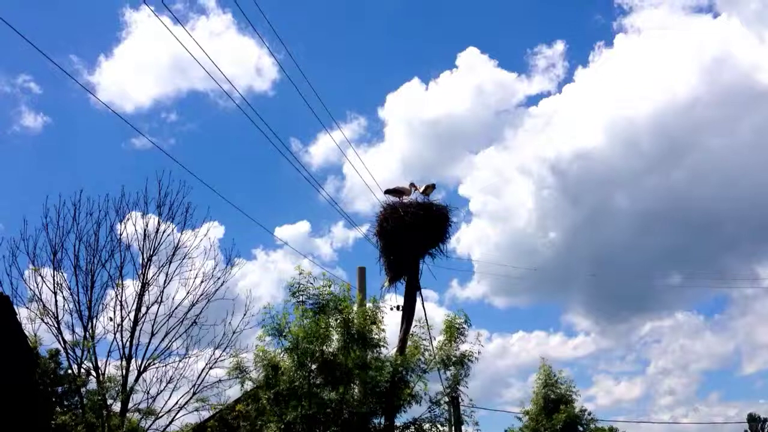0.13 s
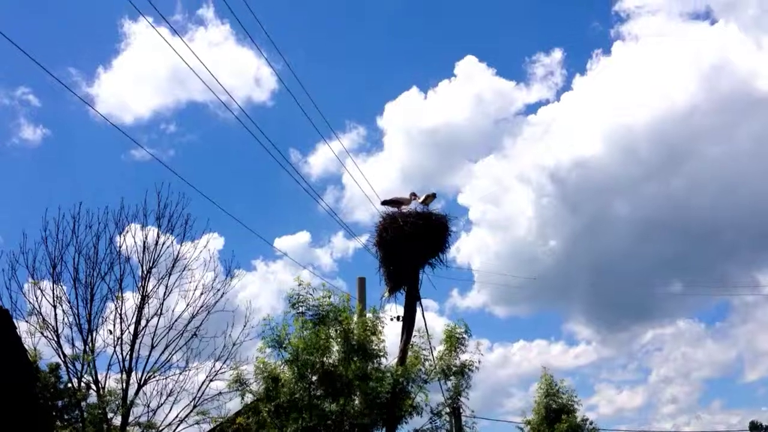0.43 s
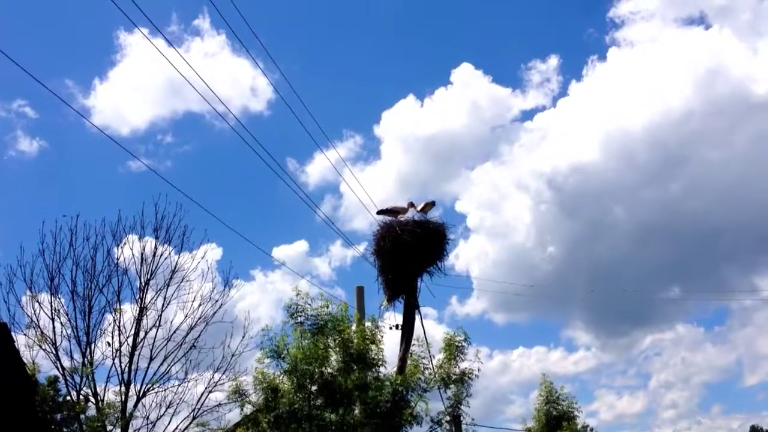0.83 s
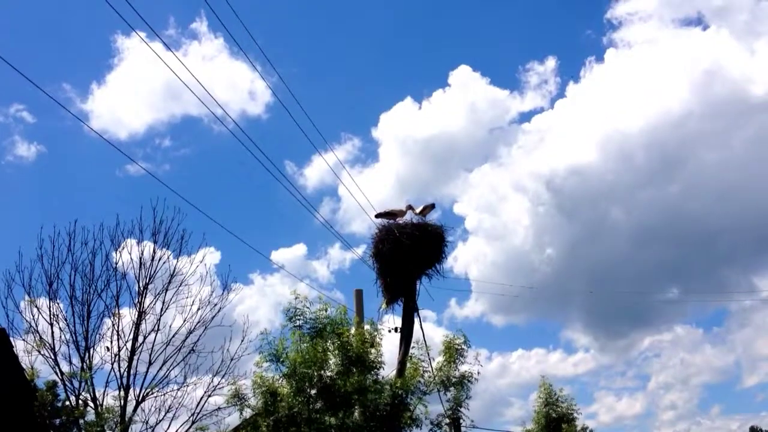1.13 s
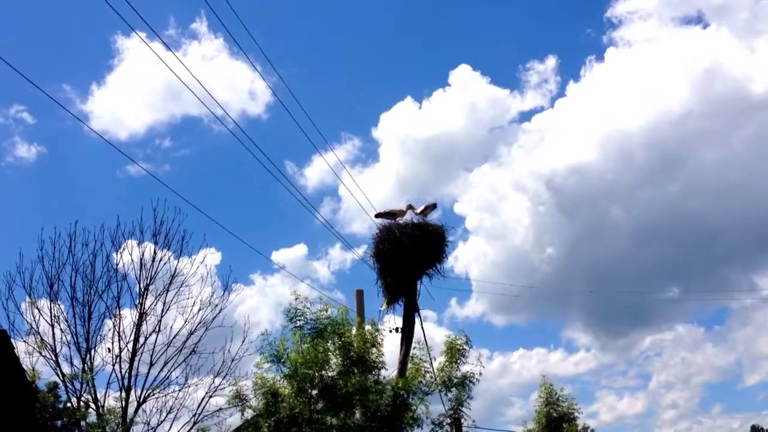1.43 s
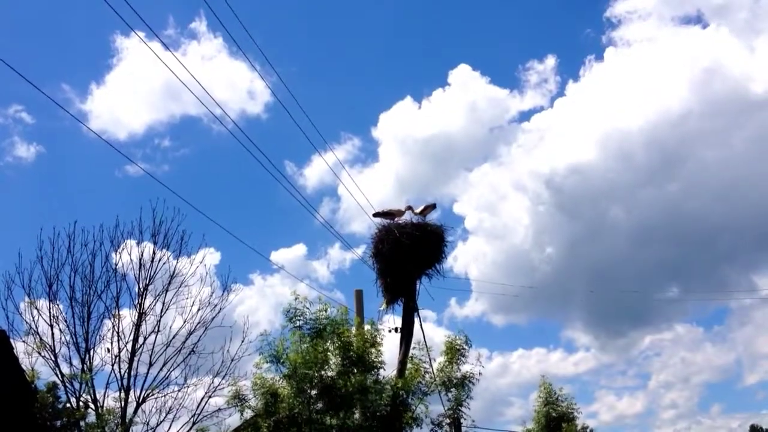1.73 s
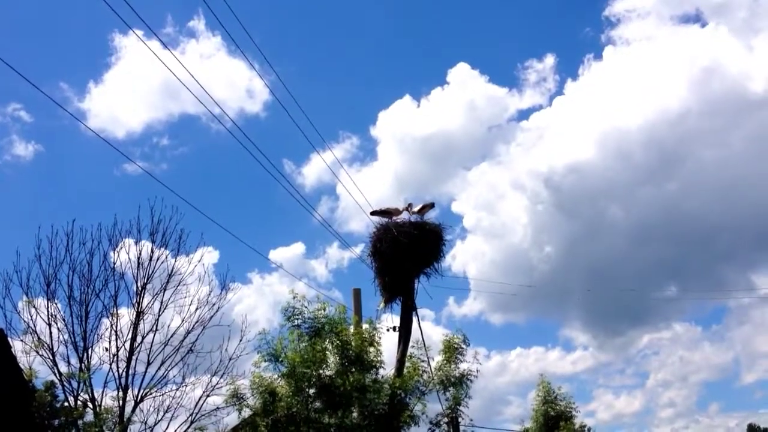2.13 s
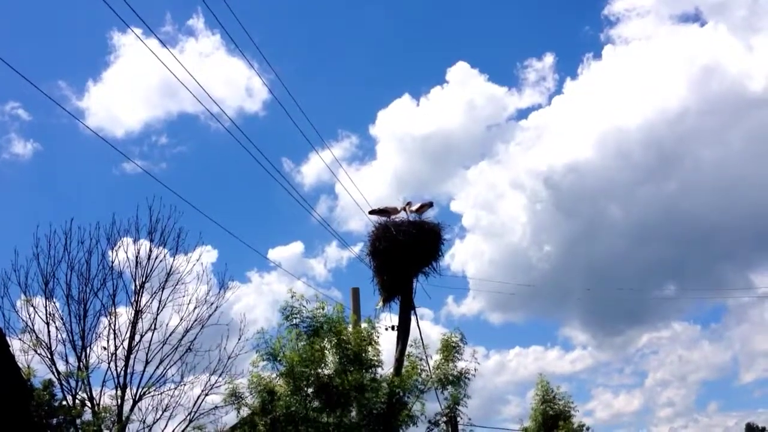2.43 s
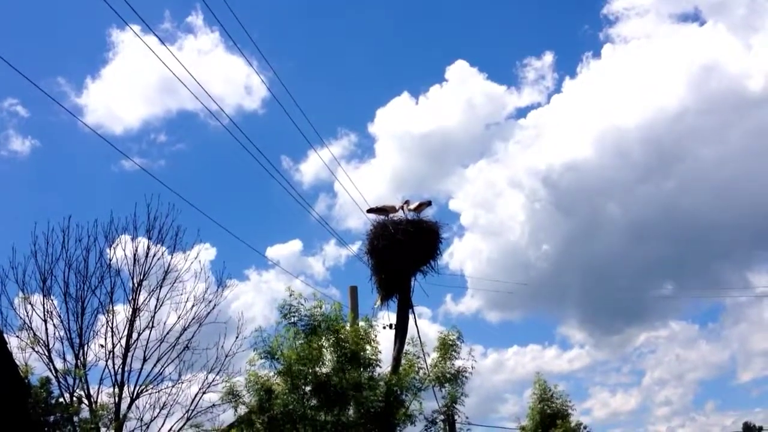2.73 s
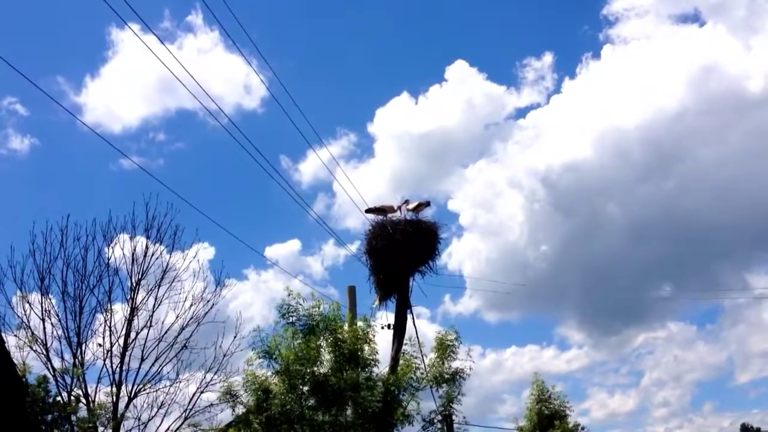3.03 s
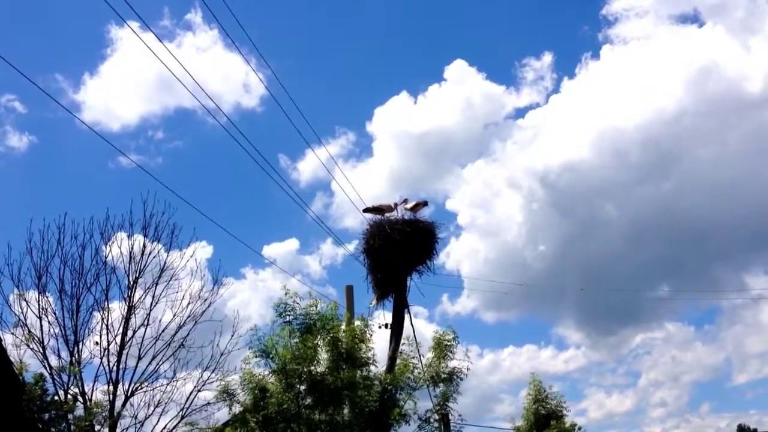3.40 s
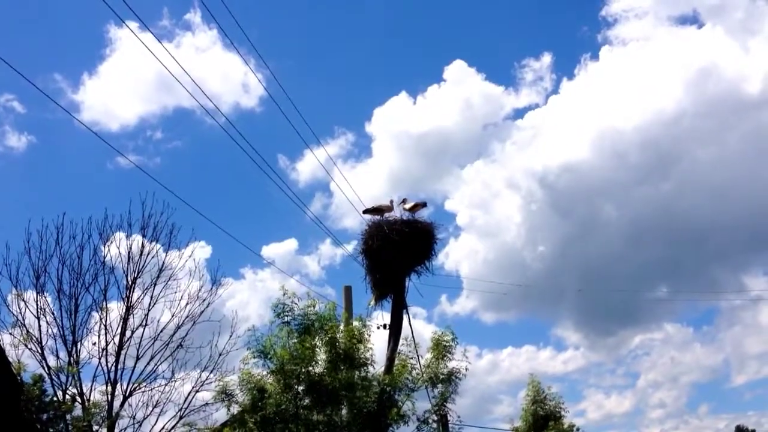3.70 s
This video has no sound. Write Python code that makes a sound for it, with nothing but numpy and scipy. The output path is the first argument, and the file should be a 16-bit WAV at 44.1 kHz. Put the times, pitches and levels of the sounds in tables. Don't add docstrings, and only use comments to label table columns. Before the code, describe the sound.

Rapid dry bill clatter from a nesting stork starts almost at once, echoing off ground and yard, then dies away before a brief piercing bird whistle; chirps continue over soft hum, leaves and small-microphone hiss.

```python
import sys
import numpy as np
from scipy import signal
from scipy.io import wavfile
from scipy.ndimage import uniform_filter1d

SR = 44100
rng = np.random.default_rng(int(sys.argv[2]) if len(sys.argv) > 2 else 0)


def volts(x):
    e = np.asarray(x, float) / 20
    return 10 ** e


def master_out(mix):
    frames = np.transpose(np.atleast_2d(mix))
    ceiling = np.clip(frames, -1, 1)
    pcm = np.round(ceiling * 32767).astype(np.int16)
    wavfile.write(sys.argv[1], SR, pcm)


N = 170226

# frequency in Hz, level in dB per Hz.
HUM_SPECTRUM = [(15, -60), (25, -48), (120, -8.5), (317, 0), (584, -5.5), (778, -8), (889, -6.5),
                (1120, -13.5), (2400, -23), (3120, -20), (5280, -120)]
LEAF_SPECTRUM = [(1500, 1), (2500, -7), (3200, 1), (4800, -1.5), (5100, -6), (7000, -8.5), (8500, -10),
                 (9500, -21)]
WIND_SPECTRUM = [(20, -22), (50, -29), (100, 0), (170, -1.5), (300, -25)]
HISS_SPECTRUM = [(6000, -13), (9000, -7), (11000, 0), (13500, 3.5), (15200, 5.5), (15450, -28),
                 (16300, -25)]

# start in seconds, length in seconds, from in Hz, to in Hz, level in dB.
WHISTLES = [(1.311, 0.04, 3900, 5050, -55), (1.349, .03, 3870, 4980, -56), (1.44, 0.055, 2210, 2430, -62),
            (1.496, .14, 2346, 2380, -61.5), (2.305, .028, 6150, 7000, -64),
            (2.35, 0.043, 2970, 3770, -56.5), (2.449, 0.035, 5700, 5590, -65),
            (2.465, 0.025, 5600, 5600, -50), (2.477, 0.086, 5600, 5700, -75), (2.678, .03, 3900, 3380, -65),
            (2.688, .02, 4660, 4730, -62), (2.802, .075, 2940, 2600, -64), (2.871, 0.082, 2583, 2490, -66),
            (2.907, .016, 3370, 4700, -63), (2.921, 0.0144, 2760, 3890, -62),
            (2.926, 0.026, 3750, 5060, -53.5), (2.935, 0.035, 3450, 4860, -59),
            (2.986, 0.028, 2450, 2410, -67), (3.028, .02, 2400, 2400, -70), (3.285, 0.019, 3290, 2470, -64),
            (3.338, .0146, 3580, 4110, -57.5), (3.34, .05, 3970, 2680, -62),
            (3.566, 0.033, 2220, 3080, -62), (3.565, 0.048, 2750, 4200, -58.5),
            (3.594, .02, 3330, 3900, -54), (3.603, 0.034, 4260, 3030, -56.5),
            (3.638, 0.11, 3540, 3350, -63.5), (3.772, 0.096, 3060, 3170, -64),
            (3.78, 0.01, 4700, 4660, -61), (3.829, 0.016, 4030, 4700, -60), (3.839, 0.017, 4750, 4760, -56)]
# start in seconds, length in seconds, from in Hz,
# to in Hz, level in dB.
CHIRPS = [(0.128, .028, 4780, 4640, -62.5), (0.17, .033, 6850, 6050, -60.5),
          (0.731, 0.018, 4220, 4020, -62), (1.1, 0.025, 4710, 4660, -65), (1.521, 0.031, 3850, 4650, -66),
          (1.628, 0.049, 4650, 5100, -60.5), (1.798, 0.037, 4030, 4780, -56.5),
          (2.073, 0.0326, 4510, 4840, -58), (2.098, 0.036, 4650, 4470, -61),
          (2.299, .022, 4660, 4710, -60.5), (2.41, 0.026, 4530, 3370, -61.5),
          (2.964, 0.028, 3850, 4900, -65), (3.076, .014, 6200, 6050, -68), (3.098, 0.024, 4720, 4840, -51),
          (3.129, 0.019, 4060, 3450, -60), (3.392, 0.0095, 4780, 4150, -66), (3.433, .021, 4780, 4200, -63),
          (3.551, 0.02, 4230, 5030, -66.5)]
# start in seconds, length in seconds, from in Hz, to in Hz,
# level in dB.
STROKES = [(1.029, .014, 3690, 4820, -57.5), (1.042, 0.024, 3990, 3490, -56),
           (1.068, .013, 4800, 4630, -64), (1.07, 0.018, 3910, 2980, -58), (1.97, 0.0081, 3930, 4750, -52),
           (1.977, 0.014, 4740, 4630, -53), (1.992, 0.0079, 3840, 4800, -50),
           (1.993, 0.015, 3230, 3570, -50.5), (2.001, 0.013, 4770, 4400, -56),
           (2.013, 0.015, 4290, 3120, -54), (2.033, .024, 3740, 2950, -60), (2.041, .015, 4800, 4440, -62),
           (2.064, 0.0147, 5350, 7600, -64), (2.19, 0.015, 3500, 3730, -68),
           (2.208, .02, 2960, 3170, -65.5), (2.316, 0.0194, 4280, 3270, -58),
           (2.336, 0.0187, 4130, 4760, -54), (3.092, .011, 3800, 4870, -57), (3.118, .009, 4750, 3500, -58),
           (3.119, 0.014, 3440, 3350, -59), (3.145, 0.024, 3026, 3240, -58.5),
           (3.166, 0.014, 3200, 4600, -56), (3.18, 0.0053, 3360, 3000, -59)]

# start in seconds, peak in dB, hollowness in dB, slap in dB,
# bite of the tips in dB.
NEAR_CLACKS = [(.2379, -21.5, -9, -1.5, 6.5), (.3444, -17.5, -6, -7, 3.5), (.4524, -17, -6.5, -6.5, 0.5),
               (.5616, -20.5, -3, -4, 4), (.6629, -19, -2.5, -4.5, -3), (.7639, -20.5, -10, -5.5, -0.5),
               (.8669, -24.5, -3, -3, -11), (.9616, -24, -4.5, -4.5, -1), (1.0595, -26, 2, -2.5, -2),
               (1.1617, -23.5, -2, 3, 1.5), (1.2745, -19, -7.5, -2, 1.5), (1.3873, -20, -2, -2, 0.5),
               (1.4992, -20, -1.5, -1.5, 1.5), (1.6088, -21.5, -5.5, -1.5, 4), (1.7185, -23, -5, 0, 2.5),
               (1.8249, -21.5, -1.5, -3.5, 0.5), (1.928, -21, -16, -6, 0.5), (2.0335, -22.5, -6, -4, 3),
               (2.1336, -23.5, -7.5, -5.5, 3), (2.2355, -28.5, 1, -5, 1.5), (2.3364, -32, -0.5, -5.5, 4),
               (2.4378, -41, 10.5, -8, 4)]
# start in seconds, peak in dB, hollowness in dB, slap in dB.
MATE_CLACKS = [(0.2151, -29, 1.5, -22), (0.3752, -31.5, -5, -14), (0.532, -31.5, 2, -5.5),
               (.6924, -36, 6.5, -26), (0.848, -39, 6, 4.5), (1.0014, -42, 12, 3), (1.3318, -36.5, 7, -2),
               (3.8565, -41, -10, -10), (.1445, -42.5, 8, -8)]
# start in seconds, peak in dB,
# hollowness in dB, slap in dB.
EARLIER_CLACKS = [
    (.09, -21, 1.5, 0),
]
# frequency in Hz, level in dB, 60 dB decay time in seconds.
BILL_MODES = [(742, -16.5, 0.028), (628, -26, 0.062), (1710, -18, 0.022), (1784, -14, 0.017),
              (2634, -12, 0.017), (3480, -13, 0.012), (4600, -18, 0.0037), (5940, -36, 0.011),
              (7120, -16.5, 0.0056), (8050, -23, 0.01), (1515, -30.5, 0.022), (2460, -27, 0.0081),
              (2990, -19, 0.012)]
# frequency in Hz, level in dB per Hz.
TICK_SPECTRUM = [(700, 5), (1250, -8), (1900, 0.5), (4500, 1.5), (5400, -7.5), (7300, -3.5), (9400, -14.5),
                 (16000, -33)]
# time in seconds, pitch as a factor.
POSTURE = [(.2, 1.023), (1.06, 1.066), (1.16, 1.022), (2.4, 0.99)]
# frequency in Hz, 60 dB decay time in seconds.
YARD_DECAY = [(400, 0.98), (1000, 0.75), (2800, 0.59), (7000, 0.64), (12000, 0.72)]

CHORUS_PER_S, CHORUS_LOW_HZ, CHORUS_TOP_HZ, CHORUS_DB = 55, 2800, 4650, -69
WARBLE_HZ, STROKE_WARBLE_HZ, WHISTLE_WARBLE_HZ, WARBLE_PER_S = 131, 60, 22, 117.3
LEVELS_OFF = 1.18
FLUTTER_DB, FLUTTER_S = 3, 0.0046
BIRD_WET_DB, BIRD_T60_S = -0.5, 0.2

TAPS = 1500
SLAP_S, SLAP_RISE_S, SLAP_SMEAR_RAD = 0.0013, 0.00055, 1.3
SCATTER, COLOUR_DB = 0.03, 5
TIP_HZ, TIP_DB, TIP_T60_S = 4040, -17.5, 0.0033
RATTLE_DB, RATTLE_T60_S = -12.5, 0.013
GROUND_S, GROUND_SPREAD_S, GROUND_DB, GROUND_DULL_HZ = 0.0051, 0.0035, -9.5, 4170
RING_IN_YARD_DB, MATE_DULL_HZ = -3.5, 6500
YARD_DB, YARD_START_S = -7.5, 0.0023
NEAR_DB, NEAR_START_S, NEAR_T60_S = -9, 0.007, 0.029


def evened(x):
    return x / np.sqrt(np.mean(x ** 2) + 1e-20)


def read(points, hz):
    f, value = np.transpose(points)
    return np.interp(np.log(hz + 1), np.log(f + 1), value)


def add(mix, s, sound):
    part = mix[round(s * SR):][:len(sound)]
    part += sound[:len(part)]


def dull(x, hz):
    return signal.lfilter(*signal.butter(2, hz, fs=SR), x)


def tail(t60s, start_s):
    hz, t, z = signal.stft(rng.standard_normal(SR // 2), SR, nperseg=128)
    decay = volts(-60 * t / read(t60s, hz)[:, None])
    out = signal.istft(z * decay, SR, nperseg=128)[1]
    out = out * np.clip(np.arange(len(out)) / SR / start_s, 0, 1) ** 2
    return out / np.linalg.norm(out)


def wash(shape, patchy_db, swell_db):
    frames, hz = N // 256 + 5, np.fft.rfftfreq(1024, 1 / SR)
    a, b, patches = rng.standard_normal((frames, 513, 3)).T
    patches = uniform_filter1d(patches, size=14, axis=0)
    patches = evened(uniform_filter1d(patches, size=10, axis=1))
    swell = evened(uniform_filter1d(rng.standard_normal(frames), size=30))
    inside = (hz >= shape[0][0]) & (hz <= shape[-1][0])
    level_db = read(shape, hz)[:, None] + patchy_db * patches + swell_db * swell
    z = (a + 1j * b) * inside[:, None] * volts(level_db)
    return evened(signal.istft(z, nperseg=1024, noverlap=768)[1][:N])


def background_air():
    hum = volts(-57.5) * wash(HUM_SPECTRUM, patchy_db=1.5, swell_db=0.17)
    leaves = volts(-65.5) * wash(LEAF_SPECTRUM, patchy_db=2.0, swell_db=1.6)
    wind_db = -67.5 - 5 * np.arange(N) / SR
    wind = volts(wind_db) * wash(WIND_SPECTRUM, patchy_db=1, swell_db=1)
    return hum + leaves + wind


def note(length, from_hz, to_hz, db, warble_hz):
    t = np.arange(0, length, 1 / SR)
    wobble = np.sin(2 * np.pi * (WARBLE_PER_S * t + from_hz / 100))
    glide = t / length
    if to_hz > from_hz:
        glide = np.sin(LEVELS_OFF * glide) / np.sin(LEVELS_OFF)
    hz = from_hz + (to_hz - from_hz) * glide + warble_hz * wobble
    soft_ends = np.sin(np.pi * t / length) ** 0.44
    level = volts(db + min(warble_hz / 60, 3) * wobble) * soft_ends
    return np.sqrt(2) * level * np.sin(2 * np.pi * np.cumsum(hz) / SR)


def far_chorus():
    far = np.zeros(N)
    span = CHORUS_TOP_HZ - CHORUS_LOW_HZ
    for s, a, b, c, d in rng.random((int(CHORUS_PER_S * N / SR), 5)):
        from_hz = CHORUS_TOP_HZ - span * b ** 1.4
        to_hz = CHORUS_TOP_HZ - span * c ** 1.4
        add(far, s * N / SR, note(0.0222 + 0.038 * a, from_hz, to_hz, 12 * d, WARBLE_HZ))
    return volts(CHORUS_DB) * evened(far)


def songbirds():
    whistles, chirps = np.zeros((2, N))
    for s, *how in WHISTLES:
        add(whistles, s, note(*how, warble_hz=WHISTLE_WARBLE_HZ))
    for s, *how in CHIRPS:
        add(chirps, s, note(*how, warble_hz=WARBLE_HZ))
    for s, *how in STROKES:
        add(chirps, s, note(*how, warble_hz=STROKE_WARBLE_HZ))
    drift = uniform_filter1d(rng.standard_normal(N), size=round(FLUTTER_S * SR))
    flutter = volts(FLUTTER_DB * evened(drift))
    whistles, chirps = whistles * np.sqrt(flutter), chirps * flutter
    trees = tail([(1000, BIRD_T60_S)], 0.0025)
    sent = volts(BIRD_WET_DB) * (chirps + 0.5 * whistles) + far_chorus()
    return whistles + chirps + signal.oaconvolve(sent, trees)[:N]


def causal(shape):
    log_gain = np.log(volts(read(shape, abs(np.fft.fftfreq(2048, 1 / SR)))))
    pulse = np.fft.ifft(np.exp(signal.hilbert(log_gain).conj())).real
    if abs(pulse[:100]).sum() <= abs(pulse[-100:]).sum():
        pulse = np.roll(pulse[::-1], 1)
    return pulse[:TAPS] / pulse.max()


def bill_ring(t, rise_db, pitch, hollow_db, slap_db):
    ring = np.zeros(TAPS)
    for (hz, db, t60), (r, q) in zip(BILL_MODES, rng.random((len(BILL_MODES), 2))):
        hollow = hz < 1000
        vary = 0.4 if hollow else 1
        level_db = db + (hollow_db if hollow else slap_db) + vary * COLOUR_DB * (q - 0.5)
        level_db = level_db + rise_db - 60 * np.maximum(t, 0) / t60
        mode_hz = hz * pitch * (1 + vary * SCATTER * (2 * r - 1))
        phase = SLAP_SMEAR_RAD * (1 + vary * (2 * q - 1))
        ring += volts(level_db) * np.cos(2 * np.pi * mode_hz * t - phase)
    return ring


def ground_echo(sound):
    ground = np.zeros(TAPS)
    ground[round(GROUND_S * SR)] = 1
    for r, q in rng.random((6, 2)):
        ground[round((GROUND_S + GROUND_SPREAD_S * r) * SR)] += 0.64 * (2 * q - 1)
    return volts(GROUND_DB) * np.convolve(sound, dull(ground, GROUND_DULL_HZ))[:TAPS]


def clack(s, peak_db, hollow_db, slap_db, bite_db=0):
    t = np.arange(TAPS) / SR - SLAP_S
    tick = causal(TICK_SPECTRUM)
    pitch = np.interp(s, *np.transpose(POSTURE))
    rise_db = -9 * (np.minimum(t, 0) / SLAP_RISE_S) ** 2
    ring = bill_ring(t, rise_db, pitch, hollow_db, slap_db)
    rattle_db = RATTLE_DB + slap_db + rise_db - 60 * np.maximum(t, 0) / RATTLE_T60_S
    grit = (2 * rng.random(TAPS) - 1) * volts(rattle_db)
    since_tick = t + SLAP_S
    tips = volts(TIP_DB + 2 * bite_db - 60 * since_tick / TIP_T60_S)
    tips = tips * np.cos(2 * np.pi * TIP_HZ * pitch * since_tick)
    snap = tick + tips + np.convolve(grit, tick)[:TAPS]
    direct = snap + ring + ground_echo(snap + ring)
    return volts(peak_db) * np.array([direct, snap + volts(RING_IN_YARD_DB) * ring])


def storks():
    direct_mix, sends = np.zeros(N), np.zeros((3, N))
    for rows, top_hz in ((NEAR_CLACKS, 20000), (EARLIER_CLACKS + MATE_CLACKS, MATE_DULL_HZ)):
        for k, row in enumerate(rows):
            direct, sent = dull(clack(*row), top_hz)
            start_s = row[0] - 2 / SR
            add(direct_mix, start_s, direct)
            add(sends[k % 3], start_s, sent)
    no_bass = signal.butter(4, 480, "high", fs=SR)
    direct_mix, sends = signal.lfilter(*no_bass, direct_mix), signal.lfilter(*no_bass, sends)
    yard = []
    for _ in sends:
        wide = volts(YARD_DB) * tail(YARD_DECAY, YARD_START_S)
        near = volts(NEAR_DB) * tail([(1000, NEAR_T60_S)], NEAR_START_S)
        yard.append(wide + near)
    return direct_mix + signal.oaconvolve(sends, yard, axes=1)[:, :N].sum(0)


def scene():
    return (background_air() + songbirds() + storks())[None]


def treble_dropout(x):
    sos = signal.butter(6, (6100, 10400), "band", fs=SR, output="sos")
    centre_s, half_length_s = 2.479, 0.016
    dropout = np.exp(-((np.arange(N) / SR - centre_s) / half_length_s) ** 6)
    return x - signal.sosfiltfilt(sos, x) * dropout


def band_limit(x):
    return signal.sosfilt(signal.butter(12, 16460, fs=SR, output="sos"), x)


def record(dry):
    x = signal.oaconvolve(dry, signal.firwin(101, 15000, fs=SR)[None], "same")
    x = x + volts(-74) * wash(HISS_SPECTRUM, patchy_db=1.5, swell_db=1.5)
    x = treble_dropout(x)
    opens_s, fade_s = 0.12, 0.0059
    x = x * np.clip((np.arange(N) / SR - opens_s) / fade_s, 0, 1)
    return band_limit(x)


dry = scene()
out = record(dry)
master_out(out)
```